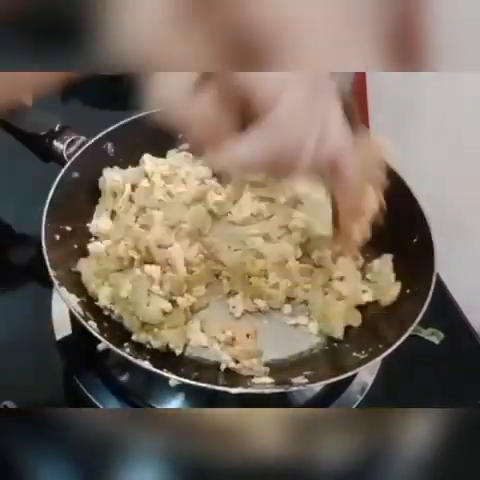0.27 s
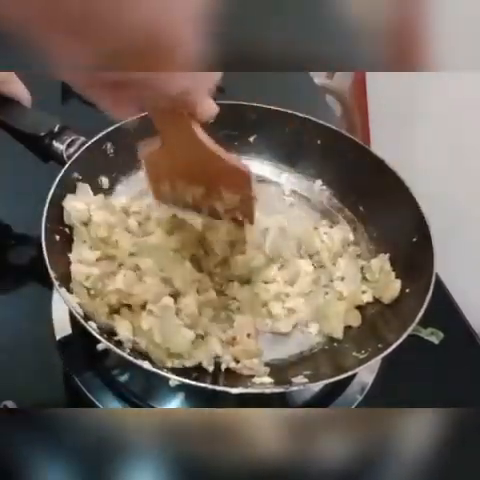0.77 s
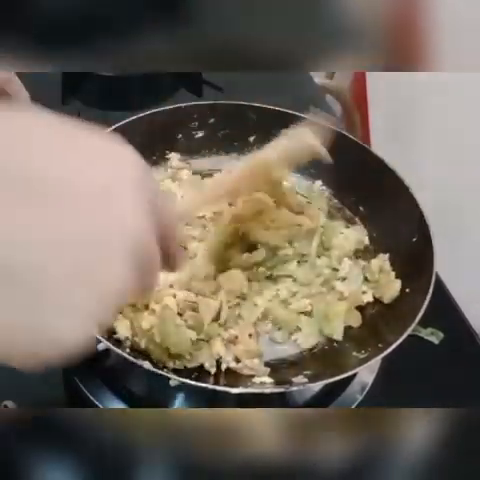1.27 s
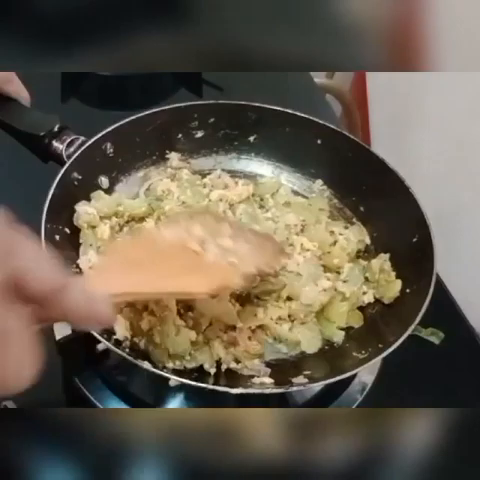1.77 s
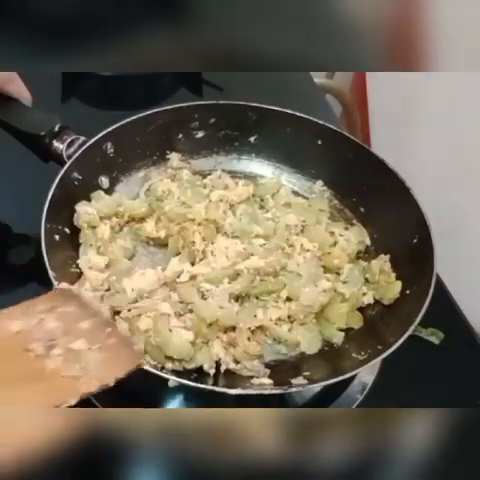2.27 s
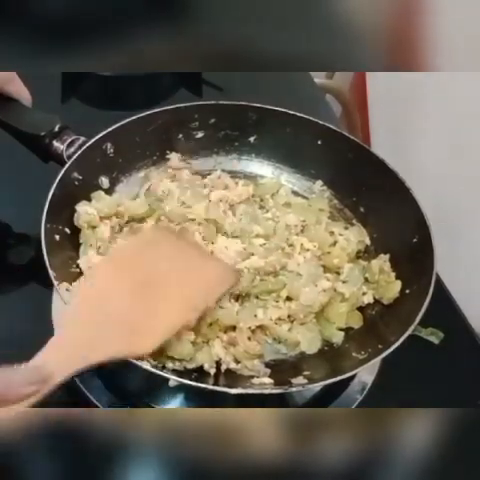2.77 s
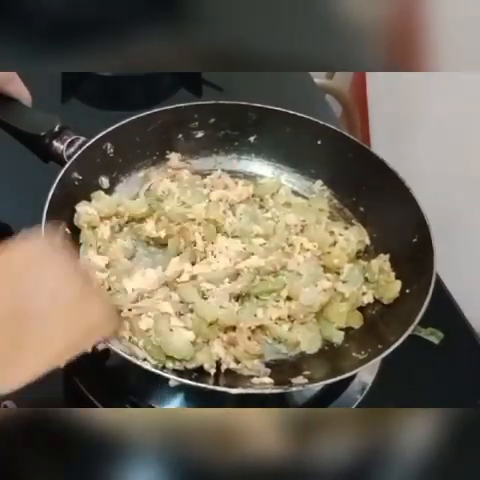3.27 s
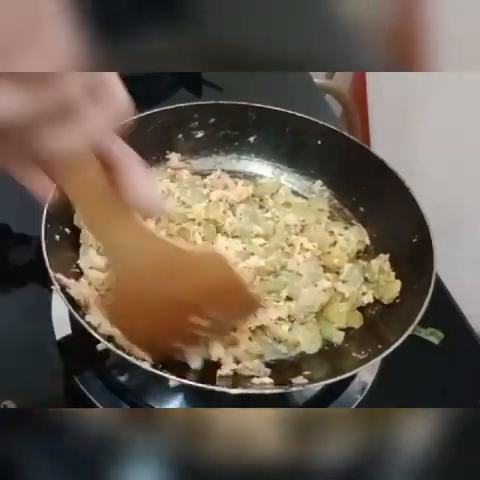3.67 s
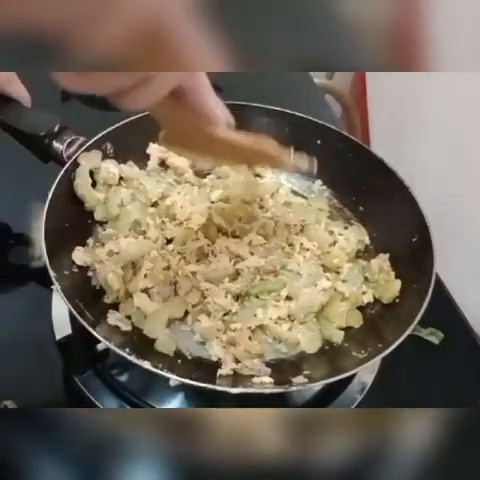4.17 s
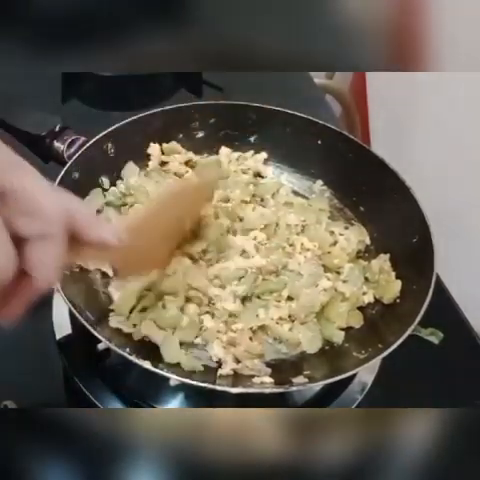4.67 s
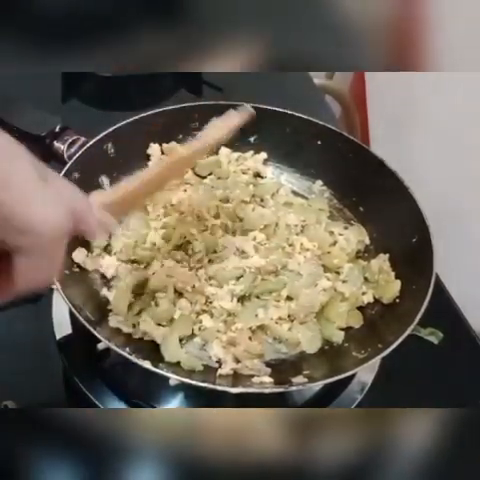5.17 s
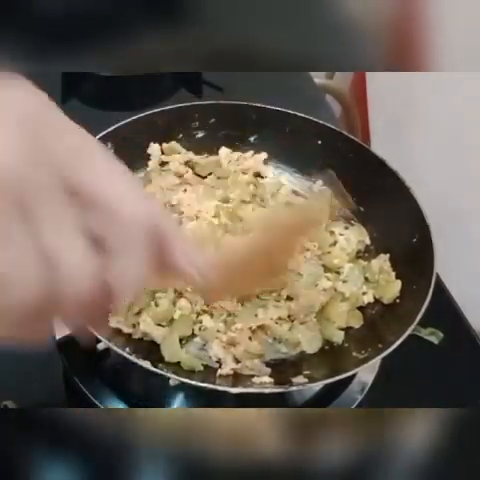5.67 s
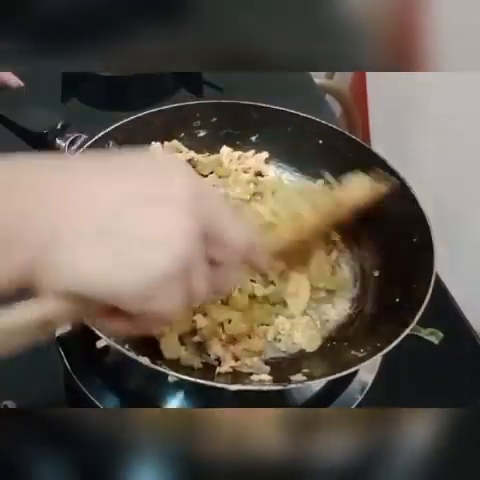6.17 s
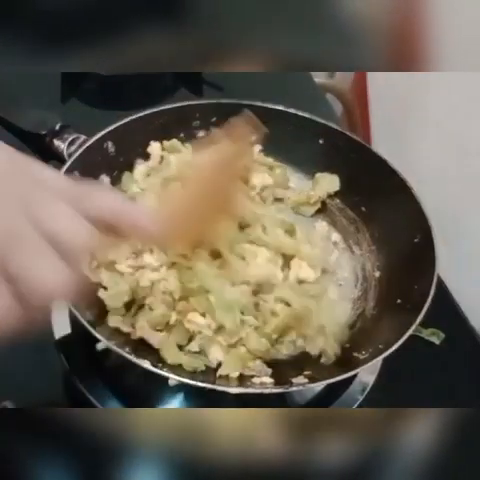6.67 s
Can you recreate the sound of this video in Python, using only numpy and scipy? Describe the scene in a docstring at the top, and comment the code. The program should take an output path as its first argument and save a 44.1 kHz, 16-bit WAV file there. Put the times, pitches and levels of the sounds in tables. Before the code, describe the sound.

Chopped wet food sizzles in a frying pan, flaring as it is stirred, while a wooden spatula knocks, rubs and judders on the metal.

```python
"""Vegetables and egg in a frying pan

Close sound of a small kitchen: chopped food sizzles, as filtered random clicks, and flares up when stirred.
A wooden spatula knocks, judders and rubs: random contact forces drive decaying modes of the pan and its wall.
Wet food squelches and grinds as coloured clicks; spitting fat makes short decaying snaps.
The pan grumbles on its stand in swelling narrow-band noise, over a steady low rumble."""
import sys
import numpy as np
from scipy import signal
from scipy.fft import rfft, irfft, next_fast_len
from scipy.io import wavfile
from scipy.ndimage import map_coordinates

SR = 44100
rng = np.random.default_rng(int(sys.argv[2]) if len(sys.argv) > 2 else 0)


def wav_record(signal):
    """Record a signal, one row per channel, as 16-bit PCM in the file named by sys.argv[1]."""
    frames = np.transpose(np.atleast_2d(signal))
    bounded = np.clip(frames, -1, 1)
    # unit amplitude maps onto the largest positive 16-bit level
    quanta = np.round(bounded * 32767).astype(np.int16)
    wavfile.write(sys.argv[1], SR, quanta)


N = 304731
TIME = np.arange(N) / SR


def amp(db):
    """Decibels to gain."""
    return 10 ** (np.asarray(db) / 20)


def unit(x):
    """Scales to rms 1."""
    return x / np.sqrt(np.mean(x ** 2) + 1e-20)


def add(mix, start_s, sound):
    """Mixes a sound in at start_s."""
    part = mix[max(round(start_s * SR), 0):][:len(sound)]
    part += sound[:len(part)]


def colour(x, points):
    """Filters by a spectrum of (f/Hz, level/dB) points; rms 1."""
    hz, db = np.transpose(points)
    size = next_fast_len(N)
    f = np.fft.rfftfreq(size, 1 / SR)
    gain = amp(np.interp(np.log(f + 1), np.log(hz), db))
    return unit(irfft(rfft(x, size) * gain, size)[..., :N])


def band(x, lo_hz, hi_hz, order=3):
    """Causal band-pass."""
    sos = signal.butter(order, [lo_hz, hi_hz], "band", fs=SR, output="sos")
    return signal.sosfilt(sos, x)


def wander(per_s):
    """Slow chance of rms 1, with about per_s new values a second."""
    values = rng.standard_normal(8192)
    return unit(np.interp(TIME * per_s, np.arange(len(values)), values))


def crackle(per_s, spread_db):
    """Random clicks of rms 1, sizes exponential in dB: above zero a few are large, below zero a few small."""
    size = amp(spread_db * np.minimum(rng.exponential(1, N), 4.5))
    signed = size * rng.choice([-1, 1], N)
    return unit(signed * (rng.random(N) < per_s / SR))


def ring(drive, modes, tilt_db=0):
    """Rings decaying modes (f/Hz, level/dB, t60/s), tilted by tilt_db per octave; rms 1."""
    t = np.arange(SR // 3) / SR
    response = np.zeros(len(t))
    for k, (hz, db, t60) in enumerate(modes):
        decay = amp(db + tilt_db * np.log2(hz / 1000) - 60 * t / t60)
        response += (-1) ** k * decay * np.sin(2 * np.pi * hz * t)
    return unit(signal.fftconvolve(drive, response)[:len(drive)])


def burst(t, rise_s, hold_s, t60_s):
    """Envelope: rises, holds until hold_s, then dies exponentially."""
    return np.minimum(t / rise_s, 1) * amp(-60 * np.maximum(t - hold_s, 0) / t60_s)


def swell(length_s, hz, width_hz):
    """Uneven slips exciting one resonance, swelling and fading; rms 0.707, as a sine of peak 1."""
    f = np.fft.rfftfreq(SR, 1 / SR)
    # half-power width before the fade: 0.82 width_hz
    resonance = 1 / (1 + (2 * (f - hz) / (0.82 * width_hz)) ** 4) ** .5
    tone = irfft(rfft(rng.standard_normal(SR)) * resonance, SR)[:int(length_s * SR)]
    return unit(tone * np.hanning(len(tone))) * np.sqrt(.5)


def strokes(rows):
    """Plays swells from rows (middle t/s, length/s, f/Hz, width/Hz, level/dB)."""
    out = np.zeros(N)
    for middle_s, length_s, hz, width_hz, db in rows:
        add(out, middle_s - length_s / 2, amp(db) * swell(length_s, hz, width_hz))
    return out


def mottle(x, depth_db, cell_hz, cell_s):
    """Uneven texture: random patches in time and frequency get louder or softer; keeps the overall level."""
    hz, t, z = signal.stft(x, SR, nperseg=2048, noverlap=1536)
    cells = rng.standard_normal((512, 512))
    grid = np.meshgrid(hz / cell_hz, t / cell_s, indexing="ij")
    field = unit(map_coordinates(cells, grid, order=1, mode="wrap"))
    patched = z * amp(depth_db * np.clip(field, -2, 2))
    y = signal.istft(patched, SR, nperseg=2048, noverlap=1536)[1][:len(x)]
    return unit(y) * np.std(x)


def reflected(x, echo_db, echo_s=0.001807):
    """A hard surface close by throws the sound back, combing it into evenly spaced bands."""
    size = next_fast_len(N + 512)
    f = np.fft.rfftfreq(size, 1 / SR)
    comb = (1 + amp(echo_db) * np.exp(-2j * np.pi * f * echo_s)) / np.hypot(1, amp(echo_db))
    return irfft(rfft(x, size) * comb, size)[:N]


# pan and stove rumble spectrum: (f/Hz, level/dB per Hz)
STOVE_SPECTRUM = [(20, -24), (45, -23.5), (70, -7.5), (110, -3), (160, 1), (210, 3), (270, -2), (330, -2),
                  (450, -9.5), (900, -31), (3000, -34.5)]


def rumble(rumble_db=-65.5, swell_db=1.3):
    """Pan and stove rumble steadily beneath, swelling a little by chance."""
    low = mottle(colour(rng.standard_normal(N), STOVE_SPECTRUM), depth_db=2.5, cell_hz=58.1, cell_s=0.073)
    return amp(rumble_db + swell_db * wander(11)) * low


# pan grumbles on its stand: (middle t/s, length/s, f/Hz, level/dB)
GRUMBLE_EVENTS = [(.27, 0.0692, 177, -62), (0.652, 0.12, 207, -61), (0.961, 0.12, 332, -57),
                  (1.69, 0.19, 154.3, -57), (1.877, 0.21, 98, -60), (2.36, 0.43, 164, -59),
                  (2.473, 0.28, 223, -59), (3.47, .34, 147, -49.5), (3.58, 0.11, 100, -60),
                  (3.995, 0.29, 330, -56), (4.1, .28, 149, -61), (4.144, 0.16, 225, -56.5),
                  (4.409, 0.051, 315, -54.5), (4.559, 0.12, 312, -60), (4.661, .073, 84, -64.5),
                  (4.861, .26, 312, -55), (5.254, 0.12, 328, -59), (6.42, .25, 199, -63.5),
                  (6.518, .21, 418, -64.5), (6.683, 1, 68.5, -63.5), (6.86, .16, 141, -54.5)]


def grumbles(width_share=0.19):
    """Pressed by the spatula, the pan shifts on its stand and one low resonance swells."""
    return strokes([(s, length_s, hz, width_share * hz, db) for s, length_s, hz, db in GRUMBLE_EVENTS])


# food turned onto the hot metal: (start t/s, length/s, sizzle level/dB, squelch level/dB)
STIR_EVENTS = [(-.05, .35, -54, -67), (0.308, 0.41, -53, -59), (0.837, 0.17, -55, -65),
               (0.98, .24, -53.5, -72.5), (1.289, 0.19, -54.5, -69), (1.636, 0.2, -58, -84),
               (2.076, .35, -63.5, -84), (2.552, 0.081, -61.5, -83), (2.835, 0.13, -63.5, -81),
               (3.328, .1, -61, -73), (3.53, 0.16, -61, -76.5), (3.64, 0.25, -58.5, -68.5),
               (3.94, 0.28, -59, -73.5), (4.3, 0.29, -59, -68), (4.66, 0.15, -56.5, -64.5),
               (4.895, 0.16, -65.5, -82), (5.135, 0.22, -61.5, -81), (5.56, 0.16, -61, -78),
               (5.972, 0.32, -56.5, -65.5), (6.256, 0.36, -59, -68), (6.619, .19, -52.5, -58.5)]


def heat(rest_db=-67.3, rise_s=0.062, t60_s=1.51, waver_db=1.1):
    """Strength of the sizzle: a resting level plus the flare of every stir, wavering a little."""
    power = amp(rest_db) ** 2
    for start_s, length_s, db, _ in STIR_EVENTS:
        flare = burst(np.maximum(TIME - start_s, 0), rise_s, length_s, t60_s)
        power = power + (amp(db) * flare) ** 2
    return np.sqrt(power) * amp(waver_db * wander(22))


def push(peak_share=0.36, end_force=0.53, release_s=0.22):
    """Force of the blade on the food: it builds early in each stir, eases and lets go."""
    power = 0
    for start_s, length_s, _, db in STIR_EVENTS:
        corners_s = [0, peak_share * length_s, length_s, length_s + release_s]
        power = power + (amp(db) * np.interp(TIME - start_s, corners_s, [0, 1, end_force, 0])) ** 2
    return np.sqrt(power)


# bursting steam bubbles spectrum: (f/Hz, level/dB per Hz)
FIZZ_SPECTRUM = [(3000, -50), (5200, -38), (6100, -11.5), (6400, -0.5), (6700, 1), (7500, 2.5), (8600, 2),
                 (9300, -1.5), (10100, 3.5), (11300, -3.5), (12500, 0.5), (13300, -9)]


def fizz(pops_db=-7, flutter_db=1.55):
    """Countless steam bubbles burst in the oil, with sparse louder pops among them."""
    fine = crackle(per_s=13000, spread_db=-4.0) * amp(flutter_db * wander(90))
    pops = np.zeros(N)
    # four pitch bands: large bubbles low, small ones high
    for hz in np.geomspace(7200, 12000, 4):
        pops += band(crackle(per_s=130, spread_db=1.0), hz * 0.97, hz * 1.34, order=1)
    bubbles = colour(fine + amp(pops_db) * unit(pops), FIZZ_SPECTRUM)
    return mottle(bubbles, depth_db=1, cell_hz=498, cell_s=0.046)


# drops of fat burst: (t/s, snap peak level/dB)
SPIT_EVENTS = [(3.192, -38.5), (3.580, -36), (4.0423, -40), (4.139, -36), (4.787, -34), (4.968, -34.5),
               (5.038, -38), (5.2505, -47), (5.293, -40.5), (5.6205, -32.5), (6.012, -34)]


def spits(snap_hz=9700, echo_db=-25, echo_t60_s=0.13):
    """A sharp decaying snap for each drop, with a faint splash of kitchen echo."""
    out, t = np.zeros(N), np.arange(SR // 10) / SR
    for start_s, db in SPIT_EVENTS:
        pitched = np.sin(2 * np.pi * snap_hz * t) + .5 * rng.standard_normal(len(t))
        snap = band(np.exp(-t / .00025) * pitched, 6200, 13000)
        splash = unit(band(rng.standard_normal(len(t)), 6900, 9400))
        echo = amp(echo_db - 60 * t / echo_t60_s) * splash
        add(out, start_s, amp(db) * (snap / abs(snap).max() + echo))
    return out


# spectra of wet food under the blade, food bubbling where it lies,
# and food grinding on the pan bottom: (f/Hz, level/dB per Hz)
SQUELCH_SPECTRUM = [(900, -7), (1700, -8), (2400, -1.5), (3300, -3), (3650, -1), (3950, 1.5), (4350, -6.5),
                    (5500, -4), (7000, -15)]
BUBBLING_SPECTRUM = [(500, -4.5), (1300, -5), (2400, 0.5), (3400, 0), (4000, -11.5), (4500, -7), (5600, -7),
                     (7000, -10.5)]
GRIND_SPECTRUM = [(200, -32), (400, -9), (700, 3), (1100, -0.5), (1400, -1), (1650, -1), (2200, -13.5),
                  (3500, -23.5), (6000, -66)]
# pan struck on its bottom: (f/Hz, level/dB, t60/s)
PAN_MODES = [(315, 1.5, 0.28), (369, -4, 0.13), (468, -9.5, 0.29), (525, -4, 0.096), (629, -5, 0.18),
             (724, 0, 0.22), (785, -13.5, 0.34), (880, -13.5, 0.34), (980, 0, 0.21), (1053, 0.5, 0.18),
             (1267, -5, 0.12), (1295, 3.5, 0.11), (1356, 1, 0.047), (1635, 8.5, 0.056), (1652, -11, 0.38),
             (1869, 5.5, 0.051), (1990, 3.5, 0.075), (2370, -17, .13), (2610, 0.5, 0.16),
             (3000, -0.5, 0.18), (3386, -26, .1), (3923, 18.5, 0.076)]


def stirring(sizzle, bubbling_db=-19, simmer_db=-73, drag_db=-19, metal_db=-4):
    """Food squelches under the push, bubbles with the sizzle and grinds on the ringing pan, more when moved."""
    clumps = crackle(per_s=7000, spread_db=2) * amp(1.5 * wander(45))
    squelch = mottle(colour(clumps, SQUELCH_SPECTRUM), depth_db=6.5, cell_hz=169.3, cell_s=.11)
    squelch = reflected(squelch, echo_db=-11)

    bubbles = colour(crackle(per_s=8000, spread_db=3.0), BUBBLING_SPECTRUM)
    bubbles = mottle(bubbles, depth_db=5.5, cell_hz=151.9, cell_s=0.15)

    grit = colour(crackle(per_s=6000, spread_db=2.0), GRIND_SPECTRUM)
    grind = unit(grit + amp(metal_db) * ring(grit, PAN_MODES))
    grind = mottle(grind, depth_db=2.0, cell_hz=132, cell_s=0.062)
    grind_gain = np.hypot(amp(simmer_db), amp(drag_db) * sizzle)
    return push() * squelch + amp(bubbling_db) * sizzle * bubbles + grind_gain * grind


# pan wall, damped by the blade: (f/Hz, level/dB, t60/s)
WALL_MODES = [(983.6, 4, 0.13), (1049, -5, 0.15), (1400, -6.5, 0.11), (1790, 2, 0.06), (1930, -8, 0.021),
              (2300, -11.5, 0.045), (2505, -14, 0.062), (3140, -5.5, 0.028)]
# rubs and squeaks of wood on metal: (middle t/s, length/s, f/Hz, width/Hz, level/dB)
RUB_EVENTS = [(.29, 0.18, 1070, 1500, -57.5), (.45, 0.19, 3340, 650, -64), (.49, .13, 2100, 1400, -62),
              (.87, 0.19, 2550, 1000, -64), (2.072, 0.033, 1350, 250, -64.5), (2.945, 0.11, 650, 220, -55),
              (2.96, .17, 2027, 50, -71), (3.79, 0.11, 3050, 400, -71), (4.39, .13, 1050, 900, -69),
              (5.335, 0.14, 1030, 564, -55), (5.345, 0.15, 2130, 900, -69), (6.075, 0.12, 1000, 900, -59.5),
              (6.07, 0.15, 2300, 884, -64), (6.7, 0.15, 3200, 1200, -62), (6.755, 0.1, 1190, 900, -55.5)]


def rubs(slip_db=2, wall_db=-8):
    """Jerky rubs of the blade, partly heard through the ringing wall."""
    slips = strokes(RUB_EVENTS) * amp(slip_db * wander(130))
    slips = reflected(mottle(slips, depth_db=6.0, cell_hz=122.7, cell_s=.07), echo_db=-12.5)
    return slips + amp(wall_db) * np.std(slips) * ring(slips, WALL_MODES)


def squeak(start_s=3.96, length_s=0.3, from_hz=1085, to_hz=1065, db=-65):
    """The blade slides evenly for a moment and makes one mode of the pan sing."""
    out, count = np.zeros(N), int(length_s * SR)
    pitch_hz = np.linspace(from_hz, to_hz, count) + 5 * wander(42)[:count]
    tone = np.sqrt(2) * np.sin(2 * np.pi * np.cumsum(pitch_hz) / SR)
    add(out, start_s, amp(db) * tone * signal.windows.tukey(count, .7))
    return out


# spatula judders along the wall: (t/s, rise/s, hold/s, level/dB over the first 50 ms,
#  tilt/dB per octave, force of the first catch, favoured f/Hz)
JUDDER_EVENTS = [(0.906, 0.00289, 0.021, -44.5, 2, 4.3, 2400),
                 (6.682, 0.022, 0.031, -42.5, -1.5, 1.1, 1460)]


def judders(grit_db=-11, release_t60_s=0.12, favour_db=8, favour_width=0.21):
    """The blade catches, then sticks and slips up the wall, which rings; each spot favours some modes."""
    out, t = np.zeros(N), np.arange(SR // 3) / SR
    for start_s, rise_s, hold_s, db, tilt_db, catch, spot_hz in JUDDER_EVENTS:
        modes = []
        for hz, mode_db, t60 in WALL_MODES:
            nearness = np.exp(-(np.log(hz / spot_hz) / favour_width) ** 2)
            modes.append((hz, mode_db + favour_db * nearness, t60))
        slips = rng.standard_normal(len(t)) * burst(t, rise_s, hold_s, release_t60_s)
        first = catch * np.exp(-((t - rise_s) / .00005) ** 2)
        grit = unit(band(slips, 500, 2600, order=4))
        sound = ring(slips + first, modes, tilt_db) + amp(grit_db) * grit
        add(out, start_s, amp(db) * sound / np.std(sound[:SR // 20]))
    return out


# spatula blows: (t/s, rise/s, hold/s, first tick level/dB re clunk, favoured f/Hz,
#  t60 factor (low when the blade stays pressed), level/dB, extra thud, clack and crack level/dB)
KNOCK_EVENTS = [(0.372, 0.0027, 0.044, -10, 525, 0.77, -40.5, -24, -6, -2),
                (1.823, 0.0036, 0.034, -4.5, 724, 0.78, -38.5, 2.5, 0, -8.5),
                (2.629, 0.0035, 0.039, -10.5, 660, 0.67, -39.5, -12, 2.5, -2),
                (3.368, 0.0034, 0.027, -6, 1345, 1.15, -34, -2, 2.5, 5.5),
                (4.729, 0.0022, 0.042, -5.5, 930, 0.86, -39.5, 0, -4, 1),
                (5.901, 0.001, 0.037, 3, 1310, 1.17, -51, 7.5, 4, 27)]
# colour of a blow: (from f/Hz, to f/Hz, level/dB, shares of extra thud, clack and crack)
BLOW_BANDS = [(99, 280, -20.5, 0.11, 0, 0), (259, 410, -10, 1, 0, 0), (426, 800, 0.5, 0.067, 0, 0),
              (816, 1463, -1.5, 0.011, 0, 0.17), (1500, 2275, -6.5, 0, 1.15, 0.1),
              (2300, 3270, -17, 0.26, 0.64, 0), (3150, 5250, -23.5, 0.029, 0, 0.74),
              (6220, 12500, -14, 0.44, 0.24, 0.23)]


def knocks(ring_db=0.0, chatter_db=-5, chatter_t60_s=0.0165, bright_t60_s=0.17, favour_db=6, soften=2.6):
    """Wood lands and chatters on the pan; spot and food decide how much it thuds, clacks or cracks."""
    out, t = np.zeros(N), np.arange(SR // 2) / SR
    early, lead = int(.06 * SR), 512  # samples: level window, room for backward filtering
    for start_s, rise_s, hold_s, tick_db, spot_hz, t60_factor, blow_db, *extras_db in KNOCK_EVENTS:
        slips, clatter = rng.standard_normal((2, len(t)))
        # the pressing blade detunes the modes a little, and each spot favours some of them
        modes = []
        for hz, db, t60 in PAN_MODES:
            nearness = np.exp(-(np.log(hz / spot_hz) / 0.053) ** 2)
            modes.append((hz * rng.normal(1, 0.0026), db + favour_db * nearness, t60 * t60_factor))
        # squaring the envelope halves its t60
        chatter = slips * burst(t, rise_s, hold_s * 0.784, 2 * chatter_t60_s) ** 2
        force = (t == 0) + amp(chatter_db) * chatter / np.linalg.norm(chatter)
        metal = ring(force, modes) * np.minimum(t / (soften * rise_s), 1)

        # hollow clunk of wood and nearby walls; the treble starts to fade first
        hollow = mottle(clatter, depth_db=4, cell_hz=55, cell_s=1)
        dull = band(hollow, 60, 2100) * burst(t, soften * rise_s, hold_s, .125)
        bright = band(clatter, 2500, 8300, order=2)
        bright = bright * burst(t, soften * rise_s, hold_s * 0.6, bright_t60_s)
        tick = unit(band(clatter * np.exp(-abs(t - rise_s) / 0.0023), 1600, 7400, order=1))

        blow = amp(ring_db) * metal + unit(dull + bright) + amp(tick_db) * tick
        blow = np.pad(blow, (lead, 0))
        for lo_hz, hi_hz, db, *shares in BLOW_BANDS:
            # forward and backward: no delay
            part = band(band(blow, lo_hz, hi_hz)[::-1], lo_hz, hi_hz)[::-1]
            gain = amp(blow_db + db + np.dot(shares, extras_db))
            add(out, start_s - lead / SR, gain * part / np.std(part[lead:lead + early]))
    return out


def scene():
    """The pan sits in the middle; only the sizzle spreads to the sides."""
    sizzle = heat()
    middle = knocks() + judders() + rubs() + squeak() + grumbles()
    middle += stirring(sizzle) + rumble() + spits() + sizzle * fizz()
    side = amp(-4.6) * sizzle * band(fizz(), 5500, 16000, order=4)
    return np.array([middle + side, middle - side])


def record(dry, notch_hz=4820, notch_width_hz=170, notch_db=-18, skirt_hz=5200, skirt_width_hz=700, skirt_db=-4):
    """The microphone has a narrow dip in the treble, with a shallow skirt; then the band limit."""
    size = next_fast_len(N + 4096)
    f = np.fft.rfftfreq(size, 1 / SR)
    dip_db = notch_db * np.exp(-((f - notch_hz) / notch_width_hz) ** 2)
    dip_db += skirt_db * np.exp(-((f - skirt_hz) / skirt_width_hz) ** 2)
    heard = irfft(rfft(dry, size) * amp(dip_db), size)[:, :N]
    lowpass = signal.firwin(801, 13220, window=("kaiser", 8), fs=SR)
    return signal.oaconvolve(heard, lowpass[None], "same")


dry = scene()
out = record(dry)
wav_record(out)
```